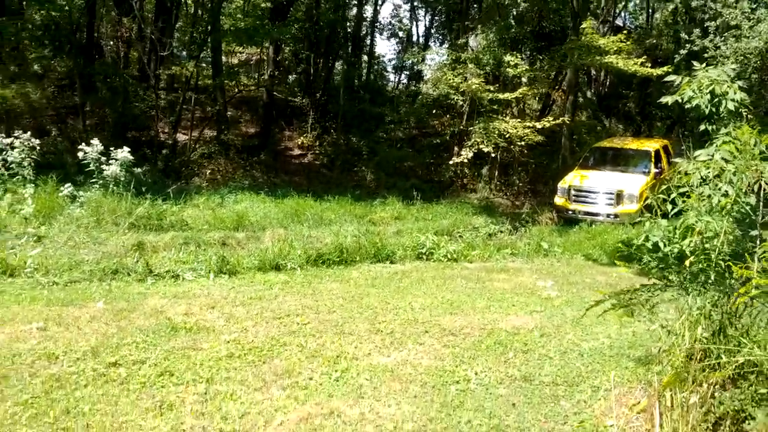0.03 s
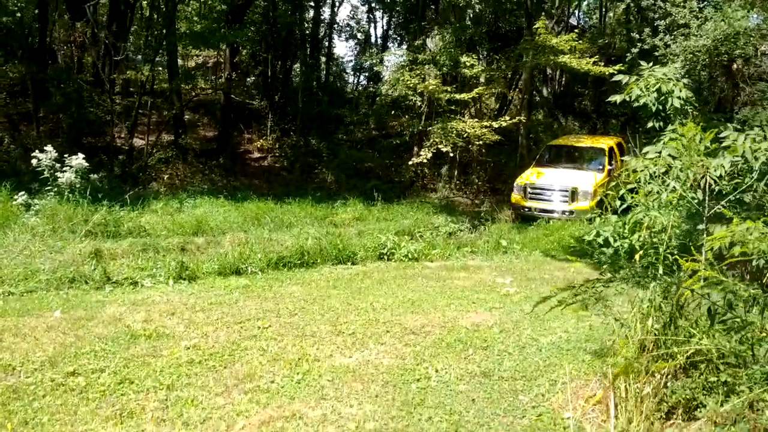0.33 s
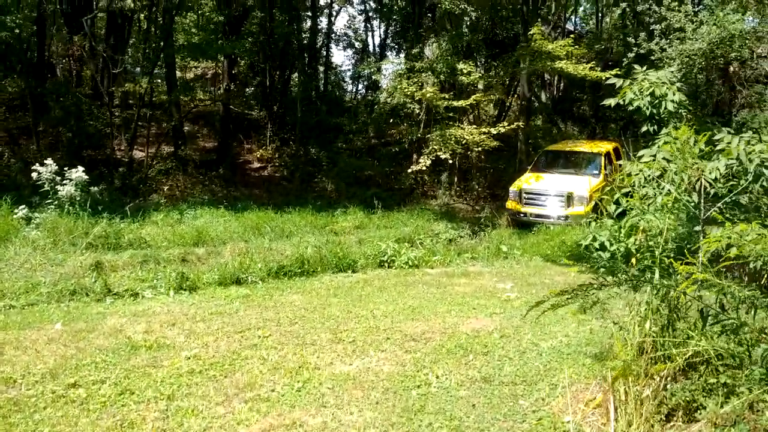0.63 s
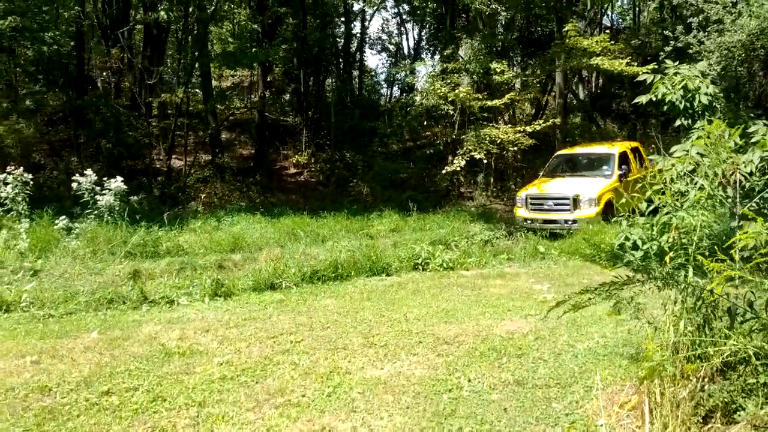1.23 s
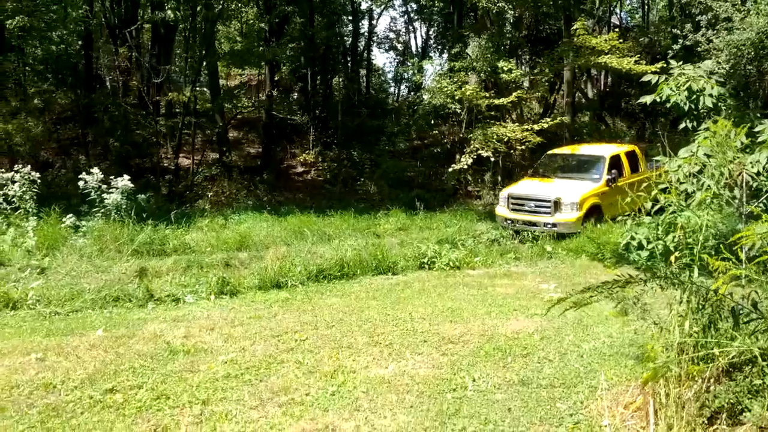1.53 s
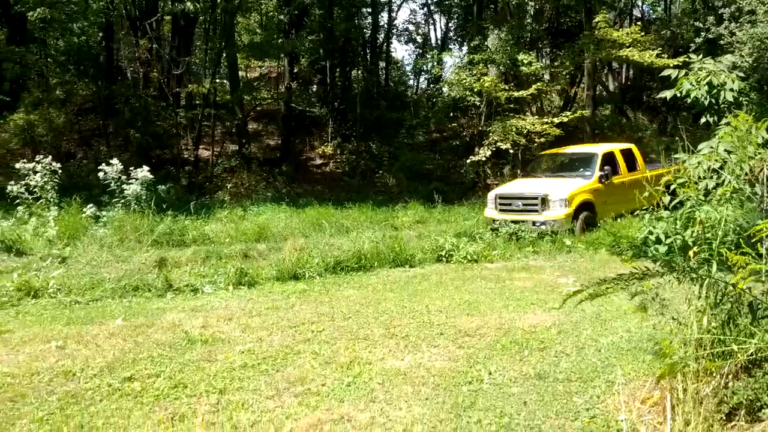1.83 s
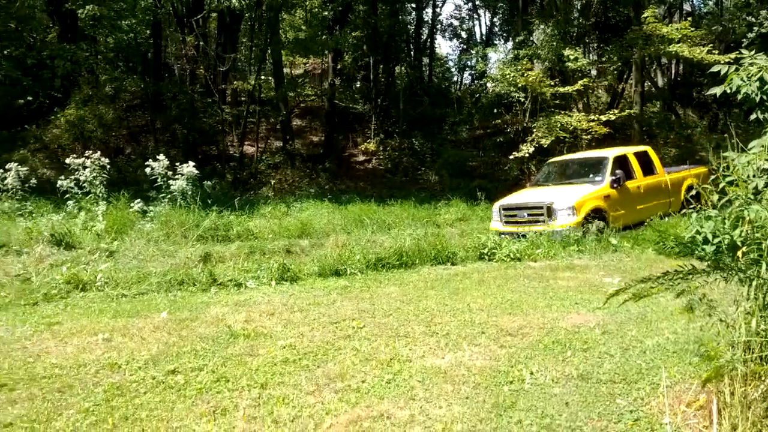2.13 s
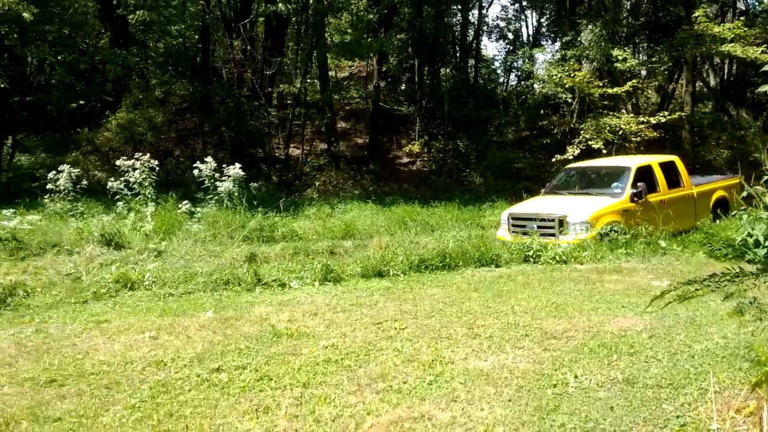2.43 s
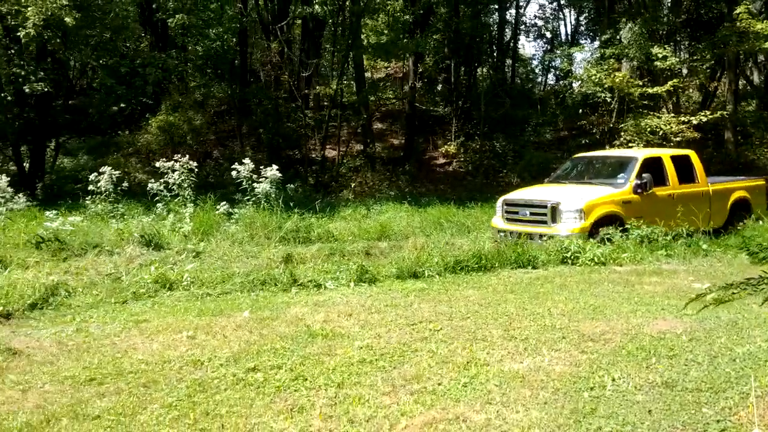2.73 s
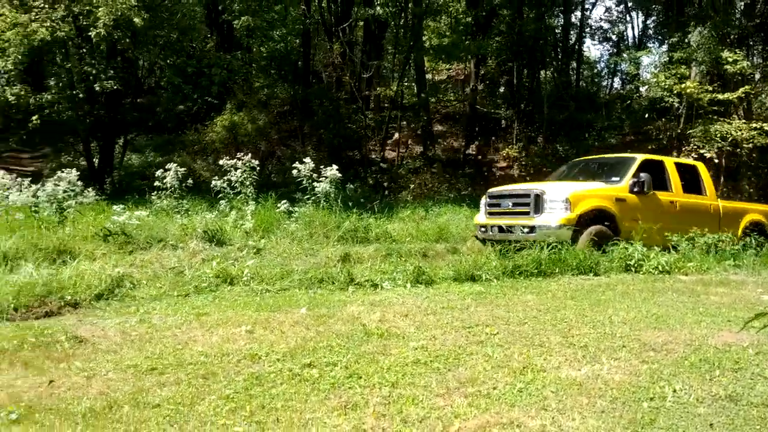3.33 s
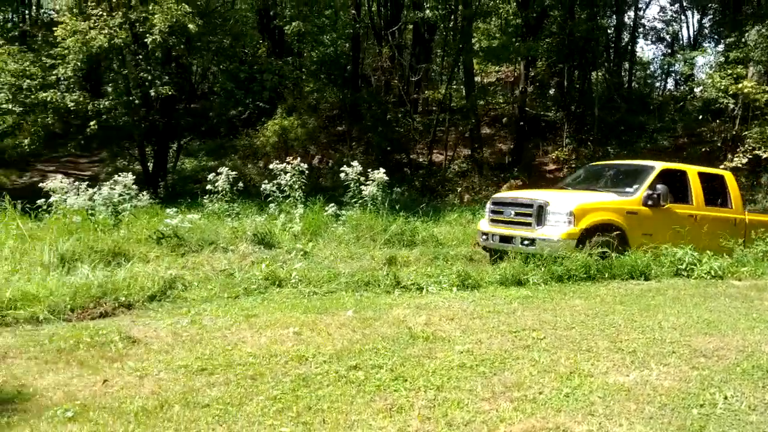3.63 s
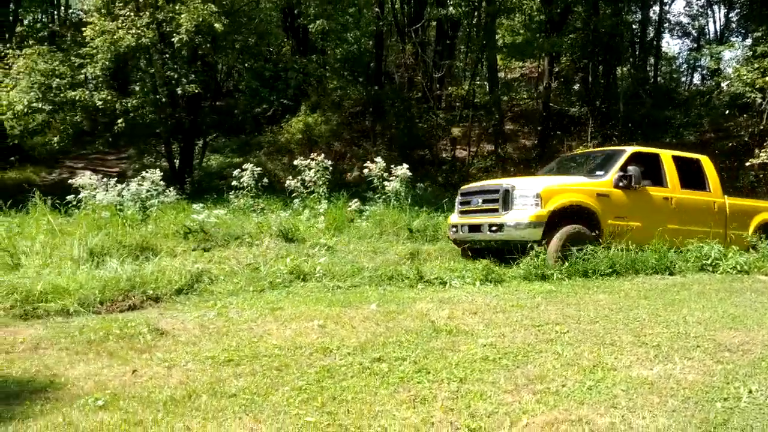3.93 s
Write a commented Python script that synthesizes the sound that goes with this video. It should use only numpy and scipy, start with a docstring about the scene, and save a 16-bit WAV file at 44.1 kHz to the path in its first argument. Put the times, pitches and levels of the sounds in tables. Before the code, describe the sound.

A diesel pickup pulls away and approaches, clattering and revving with a high turbo whine.

```python
"""Diesel pickup on rough grass

A V8 diesel pulls away from idle with faint squeaks and drives closer, revving up, heard in mono.
Periodic firing makes the exhaust drone and the block clatter; turbulent air makes the intake hiss
and the cooling fan roar, and the turbo whistles. Grass crackles, stalks snap and the body thumps
over bumps. The edge of a wood sends back a little of the clatter and hiss."""
import sys
import numpy as np
from scipy import signal
from scipy.fft import rfft, irfft
from scipy.io import wavfile

SR = 44100
rng = np.random.default_rng(int(sys.argv[2]) if len(sys.argv) > 2 else 0)


def wav_record(signal):
    """Record a signal, one row per channel, as 16-bit PCM in the file named by sys.argv[1]."""
    frames = np.transpose(np.atleast_2d(signal))
    bounded = np.clip(frames, -1, 1)
    # unit amplitude maps onto the largest positive 16-bit level
    quanta = np.round(bounded * 32767).astype(np.int16)
    wavfile.write(sys.argv[1], SR, quanta)


N = 176400
T = np.arange(N) / SR
CYLINDERS = 8
CRACK_DECAY_S = .0005


def from_db(db):
    """Amplitude ratio of a level in decibels."""
    return 10 ** (np.asarray(db) / 20)

def unit_power(x):
    """Normalisation to a mean square of one."""
    return x / np.sqrt(np.mean(x ** 2) + 1e-20)

def curve(rows):
    """Linear interpolation of (time, value) rows at every sample."""
    return np.interp(T, *np.transpose(rows))

def envelope(rows):
    """Amplitude envelope of a level curve."""
    return from_db(curve(rows))

def noise():
    """Gaussian white noise."""
    return rng.standard_normal(N)

def drift(corner_hz):
    """Slow random modulation: low-passed noise of unit power."""
    pole = np.exp(-20 * np.pi * corner_hz / SR)  # at a tenth of the sample rate
    slow = signal.lfilter([1], [1, -2 * pole, pole * pole], rng.standard_normal(N // 10 + 4002))[4000:]
    return np.interp(np.arange(N) / 10, np.arange(len(slow)), unit_power(slow))

def colour(x, spectrum):
    """Spectral shaping to unit power, with a roll-off beyond both ends of the spectrum."""
    hz, db = np.transpose(spectrum)
    f = np.maximum(np.arange(N // 2 + 1) * SR / N, 1)
    gain = from_db(np.interp(np.log(f), np.log(hz), db))
    roll_off = np.minimum(f / hz[0], 1) ** 2 * np.minimum(hz[-1] / f, 1)
    return unit_power(irfft(rfft(x) * gain * roll_off, N))

def tone(hz):
    """A sinusoid of unit power whose phase is the integral of frequency."""
    return np.sqrt(2) * np.sin(2 * np.pi * (np.cumsum(hz * np.ones(N)) / SR + rng.random()))

def narrow_noise(hz, width_hz):
    """Quadrature modulation centres a band of noise on a moving frequency."""
    phase = 2 * np.pi * np.cumsum(hz * np.ones(N)) / SR
    lowpass = signal.butter(2, width_hz / 2, fs=SR, output="sos")
    a, b = signal.sosfilt(lowpass, rng.standard_normal((2, N)))
    return unit_power(a * np.cos(phase) + b * np.sin(phase))

def window(start, end, fade_s):
    """A trapezoidal window, at half amplitude at start and end."""
    return np.clip(np.minimum(T - start, end - T) / fade_s + .5, 0, 1)


# Engine speed: (time [s], firing rate [Hz])
FIRING_RATE = [(0, 51), (.3, 46.7), (.38, 56), (.5, 72), (.78, 86.6), (1.04, 98), (1.25, 102), (1.5, 111),
               (2.03, 143), (2.27, 160), (2.5, 168), (2.85, 166), (3.02, 167), (3.25, 189), (3.5, 205),
               (3.68, 215), (4, 210)]

def combustion(jitter=.003, decay_s=.009, floor=.6, spread_db=1):
    """Periodic excitation: the firing rate and its train of decaying pulses, unequal by cylinder."""
    firing_hz = curve(FIRING_RATE) * (1 + jitter * drift(8.8))
    firings = np.cumsum(firing_hz) / SR
    count = firings.astype(int)
    strength_db = spread_db * (rng.standard_normal(CYLINDERS)[count % CYLINDERS] + noise()[count])
    age = (firings % 1) / firing_hz
    return firing_hz, unit_power(floor + from_db(strength_db) * np.exp(-age / decay_s))

# Exhaust tone at the firing rate: (time [s], level [dB])
FUNDAMENTAL_LEVEL = [(0, -50), (.35, -50), (.52, -47), (.74, -51.5), (.82, -44.5), (1.15, -46),
                     (1.25, -39.5), (1.48, -41), (1.62, -50), (2, -40), (2.3, -35.5), (2.6, -37.5),
                     (2.9, -34.5), (3.08, -24.5), (3.35, -29), (3.6, -32), (3.8, -36), (4, -55)]
# Its second harmonic: (time [s], level [dB])
OCTAVE_LEVEL = [(0, -52.5), (.38, -58), (0.522, -49), (.73, -46.5), (.8, -39), (1.13, -37.5), (1.23, -46),
                (1.36, -39.5), (1.7, -63), (3.1, -63), (3.3, -35), (4, -56)]
# Tones of uneven firing: (harmonic of the eight-cylinder cycle, relative level [dB])
UNEVEN_TONES = [(7, -9), (9, -9), (14, -8), (20, -3.5), (24, -6.5), (32, -4), (40, -8.5)]
# Envelope of the uneven tones and gas puffs: (time [s], level [dB])
EXHAUST_EFFORT = [(0, -58), (.35, -48.5), (.8, -44), (1.4, -38.5), (1.65, -40), (2.2, -39.5), (3, -34.5),
                  (3.35, -34.5), (3.7, -33), (4, -53)]
# Gas puffs: (frequency [Hz], relative spectral level [dB])
PUFF_SPECTRUM = [(20, -5), (45, 1), (70, 6), (115, 1.5), (170, 5.5), (230, 2), (290, -5.5), (450, -51)]

def exhaust(firing_hz, pulses, pipe_hz=187, pipe_width_hz=84, leak_db=-18.5):
    """Pulsating flow radiates harmonics and puffs; uneven-firing tones swell at the pipe resonance."""
    harmonics = uneven = 0
    for multiple, levels in ((1, FUNDAMENTAL_LEVEL), (2, OCTAVE_LEVEL)):
        harmonics += envelope(levels) * from_db(1.2 * drift(7.6)) * tone(multiple * firing_hz)
    for multiple, db in UNEVEN_TONES:
        hz = multiple * firing_hz / CYLINDERS
        resonance = from_db(leak_db) + 1 / (1 + (2 * (hz - pipe_hz) / pipe_width_hz) ** 2)
        uneven += resonance * from_db(db - 1.5 + 4.1 * drift(4)) * tone(hz)
    puffs = from_db(-5) * colour(pulses * noise(), PUFF_SPECTRUM)
    return harmonics + envelope(EXHAUST_EFFORT) * (uneven + puffs)

# Combustion clatter: (time [s], level [dB])
CLATTER_LEVEL = [(0, -41.5), (.325, -42), (.355, -40.5), (1, -37.5), (1.5, -35), (2.2, -32), (2.55, -34),
                 (3, -30), (3.4, -31), (4, -29)]
# Ring of the engine block: (frequency [Hz], relative spectral level [dB])
BLOCK_SPECTRUM = [(200, -25), (480, -7), (660, -4), (950, -10), (1300, -5), (1780, -6.5), (2100, -3.5),
                  (2450, 0), (2900, -2), (3200, -5), (3550, -10), (4250, -8.5), (4700, -10.5), (6400, -11),
                  (7500, -6), (15000, -24.5)]

def clatter(pulses):
    """Impulsive excitation: each firing rattles the resonances of the block."""
    return envelope(CLATTER_LEVEL) * colour(pulses * noise(), BLOCK_SPECTRUM)

# Injector hiss: (frequency [Hz], relative spectral level [dB])
INJECTOR_SPECTRUM = [(5000, -6), (9500, -14), (14500, 6), (15700, -13)]

def injectors(pulses):
    """Amplitude modulation: the injectors hiss in time with the firings, beneath the clatter."""
    hiss = colour(np.sqrt(pulses) * noise(), INJECTOR_SPECTRUM)
    return envelope(CLATTER_LEVEL) * from_db(-12.5) * hiss

# Roar of the radiator fan: (time [s], level [dB])
FAN_LEVEL = [(0, -50.5), (1, -44.5), (1.8, -45), (2.25, -37), (2.55, -39.5), (2.85, -41.5), (3.05, -32),
             (3.2, -25.5), (3.32, -18.5), (3.45, -18), (3.53, -24.5), (3.75, -23.5), (4, -27)]
# The same roar: (frequency [Hz], relative spectral level [dB])
FAN_SPECTRUM = [(30, -12), (80, 0), (125, 1), (200, 3), (350, 2), (440, -8), (530, -10.5), (750, -6),
                (1400, -5), (1800, -8.5), (2400, -7), (3800, -15), (6000, -14.5), (9000, -12),
                (15500, -13.5)]
# Hollow howl of the fan shroud: (time [s], level [dB])
SHROUD_LEVEL = [(0, -77), (.55, -51), (1.7, -54), (2.25, -40), (2.8, -41.5), (3.15, -36), (3.3, -26),
                (3.5, -30.5), (3.75, -30), (4, -31.5)]
# The same howl: (frequency [Hz], relative spectral level [dB])
SHROUD_SPECTRUM = [(400, -19), (540, -9), (670, 2.5), (770, -3), (870, -2), (980, -22), (1300, -58)]

def fan(flutter_db=2.14):
    """Turbulence from the fan radiates broadband noise; its shroud howls in a narrower band."""
    roar = envelope(FAN_LEVEL) * from_db(flutter_db * drift(23)) * colour(noise(), FAN_SPECTRUM)
    return roar + envelope(SHROUD_LEVEL) * colour(noise(), SHROUD_SPECTRUM)

# Intake hiss: (time [s], level [dB])
HISS_LEVEL = [(0, -49), (.33, -48), (.42, -45.5), (1, -40), (2.1, -31), (2.55, -35), (2.88, -28.5),
              (3.1, -24), (3.35, -18.5), (3.52, -22.5), (3.75, -23.5), (4, -23)]
# The same hiss: (frequency [Hz], relative spectral level [dB])
HISS_SPECTRUM = [(3000, 0.5), (5000, -4), (6600, -5.5), (7400, -4.5), (10200, 1.5), (12100, 3),
                 (13200, 1.5), (14500, -16), (15700, -5)]
# Air duct resonances: (start frequency [Hz], end frequency [Hz], bandwidth [Hz],
# start [s], end [s], start level [dB], end level [dB])
DUCT_BANDS = [(1346, 1350, 450, -0.22, 1.64, -53.5, -44), (7180, 7200, 540, -0.54, 0.95, -45, -49),
              (8090, 8010, 680, -.2, 1.5, -50, -49), (9540, 10050, 580, 0.45, 1.7, -47, -40),
              (5720, 5950, 200, 0.35, 1.43, -54, -47.5), (8440, 8550, 457, 1.7, 4.1, -43, -35.5),
              (2910, 2950, 330, 0.4, 3.28, -47.5, -38)]

def intake(pulses, hiss_pulsing=.12, duct_pulsing=.84, flutter_db=1.5):
    """Broad flow noise and narrow duct resonances, amplitude-modulated by the firings."""
    flutter = from_db(flutter_db * drift(42))
    hiss = envelope(HISS_LEVEL) * flutter * colour(pulses ** hiss_pulsing * noise(), HISS_SPECTRUM)
    throb = unit_power(pulses ** duct_pulsing)
    for start_hz, end_hz, width_hz, start, end, start_db, end_db in DUCT_BANDS:
        hz = np.interp(T, [start, end], [start_hz, end_hz])
        gain = from_db(np.interp(T, [start, end], [start_db, end_db]))
        hiss += window(start, end, fade_s=.25) * throb * gain * narrow_noise(hz, width_hz)
    return hiss

def grass(breaks_per_s=120, spread_db=1.3):
    """Blades break as a Poisson process; the tiny bursts share the hiss's envelope and spectrum."""
    breaks = rng.random(N) < breaks_per_s / SR
    sizes = from_db(spread_db * np.minimum(rng.exponential(1, N), 4))
    bursts = signal.lfilter([1], [1, -np.exp(-1 / (CRACK_DECAY_S * SR))], breaks * sizes + 1e-18)
    return envelope(HISS_LEVEL) * from_db(-11) * colour(bursts * noise(), HISS_SPECTRUM)

# Echoes from the trees: (delay [s], gain [dB])
TREE_ECHOES = [(0.03, -24.5), (.074, -15.5), (0.127, -29)]

def trees(direct):
    """Reflection at the edge of the wood adds weak, delayed copies to the direct sound."""
    return direct + sum(from_db(db) * np.interp(T - delay, T, direct, left=0) for delay, db in TREE_ECHOES)

# Faint squeaks: (peak time [s], level [dB], frequency [Hz], half duration [s])
SQUEAKS = [(.055, -55, 5050, .025), (.22, -58, 5100, .012), (.303, -47, 4900, .009),
           (.945, -42, 7220, .045)]

def squeaks(waver=.0067):
    """Frequency-modulated tones under Gaussian envelopes, as the truck gets going."""
    return sum(from_db(db) * np.exp(-((T - peak) / half_s) ** 2) * tone(hz * (1 + waver * drift(63)))
               for peak, db, hz, half_s in SQUEAKS)

def whistle(pitch, levels, width_hz, tone_db, air_db, waver_hz, flicker_db):
    """A blade-passing tone in a band of flow noise, for the span of its pitch curve."""
    hz = curve(pitch)
    sounding = (T >= pitch[0][0]) & (T <= pitch[-1][0])
    blades = from_db(tone_db + flicker_db * drift(35)) * tone(hz + waver_hz * drift(41.3))
    return sounding * envelope(levels) * (blades + from_db(air_db) * narrow_noise(hz, width_hz))

# Turbo spooling up: (time [s], frequency [Hz])
SPOOL_PITCH = [(1.42, 10000), (1.52, 10600), (1.88, 13050), (2.18, 15300), (2.33, 16000)]
# Its envelope: (time [s], level [dB])
SPOOL_LEVEL = [(1.42, -56), (1.52, -38), (1.71, -34.5), (1.88, -40.5), (2.02, -35), (2.18, -33.5),
               (2.33, -46)]
# Turbo at full boost: (time [s], frequency [Hz])
BOOST_PITCH = [(2.45, 9400), (2.8, 10150), (3.06, 10830), (3.25, 11750), (3.43, 12450), (3.51, 12590),
               (3.68, 12480), (3.78, 12730), (3.87, 13120), (3.94, 13260), (4, 13240)]
# Its envelope: (time [s], level [dB])
BOOST_LEVEL = [(2.45, -53), (2.8, -45), (3.05, -36), (3.25, -24), (3.37, -20.5), (3.46, -28), (3.53, -20.5),
               (3.67, -25.5), (3.75, -22.5), (3.829, -27), (3.91, -24), (4, -26)]

def turbo():
    """Blade-passing frequency rises with rotor speed: an airy sweep, then a purer one at full boost."""
    spool = whistle(SPOOL_PITCH, SPOOL_LEVEL, width_hz=580,
                    tone_db=-8, air_db=0, waver_hz=80, flicker_db=3)
    boost = whistle(BOOST_PITCH, BOOST_LEVEL, width_hz=900,
                    tone_db=1, air_db=-2, waver_hz=18, flicker_db=2.5)
    return spool + boost

# Drones under load: (harmonic of the eight-cylinder cycle, start [s], end [s], level [dB])
LOAD_DRONES = [(10, 1.82, 2.42, -39), (11, 2.33, 5.2, -41), (42, 2.45, 3.4, -46.5)]

def drones(firing_hz, waver_db=1.7):
    """Cycle harmonics from the two cylinder banks beat against the firing tone."""
    out = 0
    for multiple, start, end, db in LOAD_DRONES:
        gain = window(start, end, fade_s=.21) * from_db(db + waver_db * drift(9))
        out += gain * tone(multiple * firing_hz / CYLINDERS)
    return out

# Knocks, and stalks under the tyres: (time [s], level [dB], low edge [Hz], high edge [Hz], decay [s])
SNAPS = [(2.235, -27.5, 500, 3800, .025), (2.904, -16, 7000, 15000, .008), (2.916, -25, 7000, 14000, .015),
         (3.221, -16, 7000, 15000, .012), (3.273, -20.5, 620, 830, .035), (3.288, -19, 4000, 12000, .005),
         (3.333, -17, 3500, 4100, .012), (3.334, -13.5, 3000, 12000, .009), (3.391, -17, 7500, 12000, .009),
         (3.457, -22, 620, 850, .016), (3.483, -17, 7000, 13000, .004), (3.694, -25, 620, 780, .02),
         (3.859, -19, 7000, 13000, .011)]

def snaps(crack_db=-4):
    """Impact and fracture give noise transients: a sharp crack and a short splintering tail."""
    out = 0
    for start, db, low_hz, high_hz, decay_s in SNAPS:
        age = np.maximum(T - start, 0)
        burst = (T >= start) * (np.exp(-age / decay_s) + from_db(crack_db) * np.exp(-age / CRACK_DECAY_S))
        band = signal.butter(2, [low_hz, high_hz], "band", fs=SR, output="sos")
        gain = from_db(db) * np.sqrt(SR / 2 / (high_hz - low_hz))  # power independent of bandwidth
        out += gain * signal.sosfilt(band, burst * noise() + 1e-18)
    return out

# Panel booms as the body drops into ruts: (time [s], level [dB], frequency [Hz])
PANEL_BOOMS = [(3.058, -17.5, 73), (3.298, -18, 190), (3.366, -17, 205), (3.395, -19, 73),
               (3.583, -19, 200), (3.7, -21, 220)]

def thumps(rise_cycles=1.5, decay_cycles=3.6):
    """Damped vibration: each jolt sets the body panels booming for a few cycles."""
    out = 0
    for start, db, hz in PANEL_BOOMS:
        cycles = np.maximum(T - start, 0) * hz
        rise = 1 - np.exp(-(cycles / rise_cycles) ** 2)
        out += from_db(db) * rise * np.exp(-cycles / decay_cycles) * tone(hz)
    return out


def scene():
    """Superposition of all the sources, alike in both channels."""
    firing_hz, pulses = combustion()
    engine = turbo() + exhaust(firing_hz, pulses) + drones(firing_hz) + fan()
    engine += trees(clatter(pulses) + intake(pulses) + injectors(pulses))
    truck = engine + thumps() + snaps() + grass() + squeaks()
    return np.array([truck, truck])

def record(dry, cutoff_hz=15650):
    """Band limiting: an elliptic low-pass filter cuts the highest treble steeply."""
    return signal.sosfilt(signal.ellip(12, .2, 80, cutoff_hz, fs=SR, output="sos"), dry)


dry = scene()
out = record(dry)
wav_record(out)
```